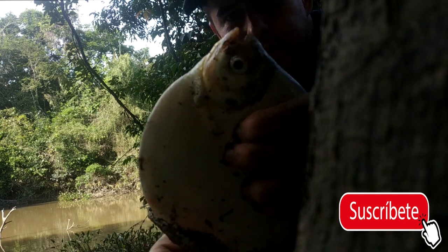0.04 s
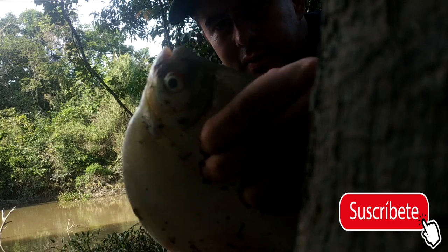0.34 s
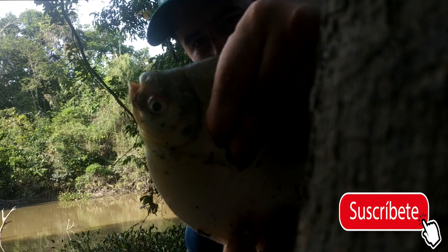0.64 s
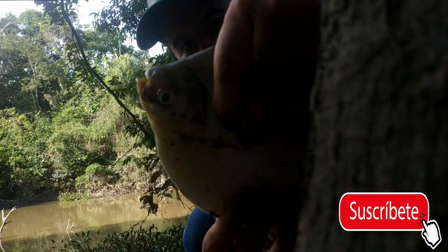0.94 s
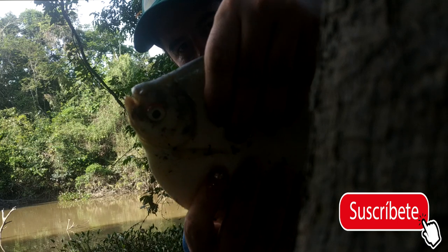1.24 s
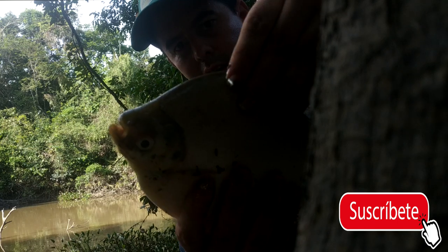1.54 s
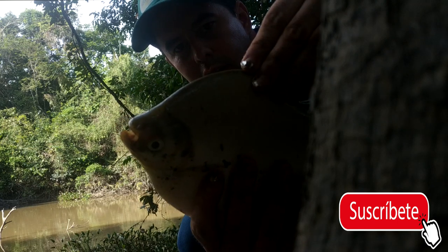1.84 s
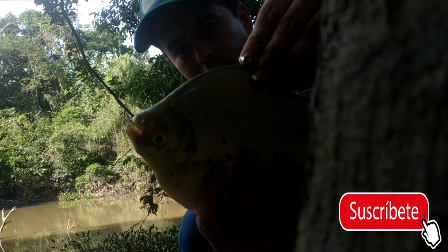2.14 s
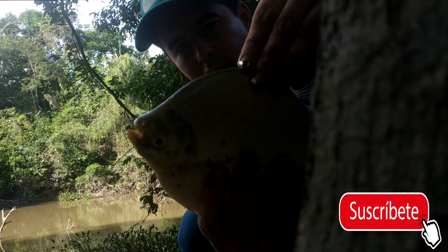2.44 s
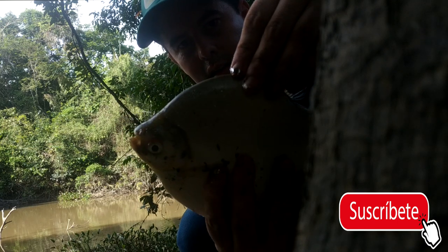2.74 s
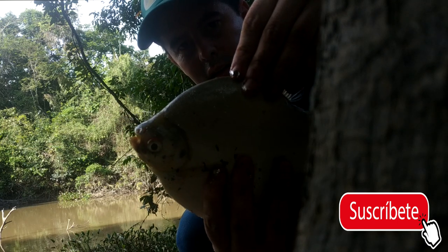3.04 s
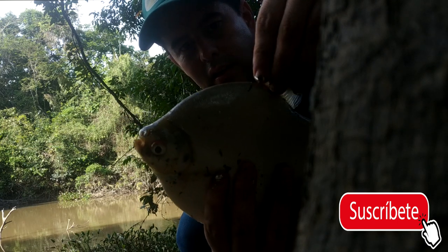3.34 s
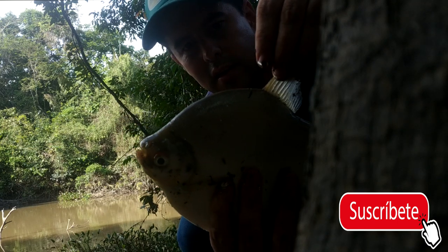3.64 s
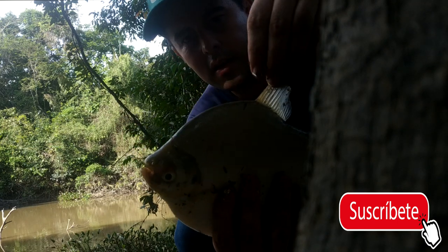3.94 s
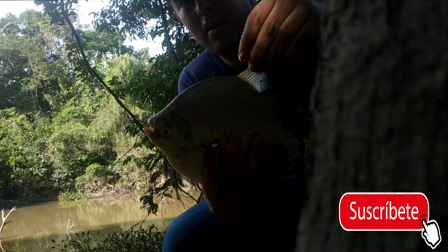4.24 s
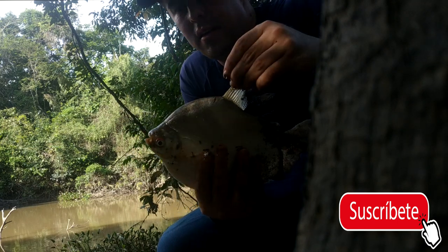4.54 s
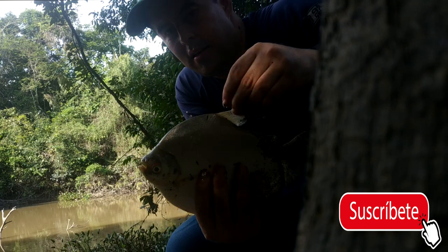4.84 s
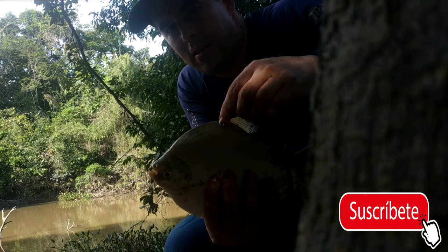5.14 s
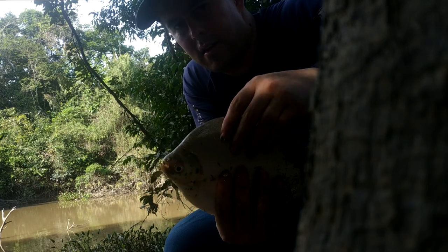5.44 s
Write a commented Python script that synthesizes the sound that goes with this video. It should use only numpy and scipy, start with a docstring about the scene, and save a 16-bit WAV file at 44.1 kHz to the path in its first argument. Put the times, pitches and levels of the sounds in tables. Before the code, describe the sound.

A high-pitched cicada chorus buzzes without a break for the whole five and a half seconds, outdoors on a wooded river bank. It is by far the loudest sound. One cicada is nearer and to the right, with a fast, fine rattle; a neighbour beats gently against it, and more distant ones blend into a hiss among the leaves. At about 0.7 seconds a bird gives one short, faint, falling chirp that lingers slightly in the trees. A tiny dry tick comes at about 2.4 seconds, and a second similar chirp at about 3 seconds. A hand brushes barely audibly over a fish at 0.3 seconds, then rubs softly over its scales from about 4 to 4.4 seconds, just as the near cicada swells slightly. A quiet, low wash of open air and a faint woodland hiss continue underneath throughout.

```python
"""A wooded river bank. A cicada buzzes as its two tymbals buckle in turn: a train of impulses, shaped by
the resonances of tymbal and abdomen and scattered by the foliage. A neighbour at almost the same rate
beats against it, and more drone further off. A bird gives two short falling chips, a hand rustles by
friction over a fish that it holds, and something ticks faintly. Beneath it all lie the low wash of the
open air and the hiss of the woods."""
import sys
import numpy as np
from scipy import signal
from scipy.fft import rfft, irfft, next_fast_len
from scipy.io import wavfile
from scipy.ndimage import uniform_filter1d, map_coordinates

SR = 44100
rng = np.random.default_rng(int(sys.argv[2]) if len(sys.argv) > 2 else 0)


def materialize(psi):
    """Save the field psi as 16-bit PCM at rate SR to the path in sys.argv[1].

    A 1-D psi becomes a single channel; in a 2-D psi each row is a channel.
    """
    bounded = np.clip(np.atleast_2d(psi).T, -1, 1)
    quanta = np.round(bounded * 32767).astype(np.int16)
    wavfile.write(sys.argv[1], SR, quanta)


N = 246430

# Cycle rate of each tymbal of the near cicada, slowly rising: t/s, f/Hz
NEAR_RATE = [(0, 77.66), (.75, 77.87), (1.35, 77.98), (2.0, 78.0), (3.0, 78.19), (3.25, 78.21),
             (3.6, 78.36), (4.0, 78.45), (5.0, 78.88), (5.59, 79.04)]
# Its direct sound, which comes and goes with the cover in between: t/s, level/dB
DIRECT_LEVEL = [(0.0, -37.5), (0.17, -35.8), (0.42, -41), (0.65, -39.3), (0.9, -42), (1.4, -41.5),
                (1.75, -36.5), (2.0, -38.3), (2.2, -38.5), (2.65, -41), (3.05, -37.5), (3.35, -37.5),
                (3.6, -39), (3.85, -36.8), (4.08, -33.3), (4.28, -31.4), (4.5, -35.3), (4.72, -35),
                (5.1, -37.3), (5.35, -40.5), (5.59, -39.5)]
# Base level shared by its echoes and all the other cicadas: t/s, level/dB
CHORUS_LEVEL = [(0, -36.5), (0.6, -36.5), (1.1, -36), (1.9, -35.5), (2.45, -37), (2.75, -36.2),
                (3.3, -36.5), (3.9, -36), (4.3, -35.5), (4.55, -35.5), (5.0, -35.5), (5.59, -35.5)]
def near_cicada(left_db=-5, scattered_db=-2, left_lag_samples=20):
    """Time and level differences place the direct clicks on the right; leaf echoes follow them."""
    song = tymbals(curve(NEAR_RATE) + .008 * wobble(5), jitter_us=5, gap_ms=.39)
    right = song * amp(curve(DIRECT_LEVEL))
    left = amp(left_db) * np.roll(right, left_lag_samples)
    echoes = foliage(song, t60=.088, sparse=1.6, patterns=12)
    return np.array([left, right]) + echoes * amp(curve(CHORUS_LEVEL) + scattered_db)


# Resonances of tymbal and abdomen: f/Hz, relative level/dB
SONG_SPECTRUM = [(4500, -48), (6250, -36.5), (6700, -13), (7100, -6), (7450, -5.5), (7900, -0.5),
                 (8400, -1.5), (9000, 0.5), (9450, 1.5), (9900, -0.3), (10250, 0.1), (10600, -6),
                 (11050, -7.5), (11700, -15.5), (12400, -20), (13200, -23), (15700, -32.5)]
# The two tymbals: phase/cycles, relative level/dB
TYMBAL_PAIR = [(0, 0), (.505, -.5)]
def tymbals(rate, jitter_us, gap_ms, spread_db=.8, second_rib_db=-5.5):
    """Buckling excites resonance: two tymbals snap in turn, a little unevenly, two ribs to a snap."""
    phase = np.cumsum(rate) / SR + rng.random()
    cycles = np.arange(1, int(phase[-1]))
    train = np.zeros(N)
    for turn, side_db in TYMBAL_PAIR:
        snap = np.interp(cycles + turn, phase, np.arange(N))
        for at, rib_db in ((snap, 0), (snap + gap_ms * SR / 1e3, second_rib_db)):
            late, size = rng.standard_normal((2, len(at)))
            train += impulses(at + late * jitter_us * SR / 1e6, amp(side_db + rib_db + spread_db * size))
    return coloured(train, SONG_SPECTRUM)


# Cycle rate of the neighbour, rising and falling back in turns: t/s, f/Hz
SECOND_RATE = [(0, 77.55), (1.15, 77.8), (1.28, 77.53), (2.2, 77.76), (3.15, 77.95), (3.25, 77.6),
               (3.7, 77.53), (5.59, 77.82)]
def neighbour(gain_db=-5, right_db=2.5):
    """Beating: a second cicada, heard only through the leaves, sings at almost the rate of the first."""
    song = tymbals(curve(SECOND_RATE) + .008 * wobble(5), jitter_us=5, gap_ms=.44)
    echoes = foliage(song, t60=.27, sparse=1.5, patterns=7)
    return echoes * amp(curve(CHORUS_LEVEL) + gain_db) * amp([[0], [right_db]])


# The distant singers: cycle rate f/Hz, relative level/dB, gap between ribs t/ms
FAR_SINGERS = [(74.44, 3.5, 0.323), (81.8, 4.5, 0.441)]
def far_cicadas(buzz_db=-9, haze_db=-5, right_db=4):
    """Incoherent summation: two buzzes stand out deep in the trees, and many more merge into a hiss."""
    buzz = np.zeros((2, N))
    for rate, db, gap_ms in FAR_SINGERS:
        song = tymbals(rate + .05 * wobble(3), jitter_us=15, gap_ms=gap_ms)
        buzz += amp(db) * foliage(song, t60=.48, sparse=1.8, patterns=5)
    haze = coloured(rng.standard_normal((2, N)), SONG_SPECTRUM)
    chorus = amp(buzz_db) * unit(buzz) + amp(haze_db) * haze
    return chorus * amp(curve(CHORUS_LEVEL)) * amp([[0], [right_db]])


# The bird's chips: onset t/s, source level/dB, start f/Hz, end f/Hz, duration t/s
BIRD_CHIPS = [(.690, -38.6, 3000, 1680, .038), (3.044, -39.9, 3000, 1660, .034)]
# Resonances of throat and beak: f/Hz, gain/dB
THROAT_GAIN = [(1500, -18), (1850, -4), (2050, -5), (2300, -1), (2500, -7), (2700, -8), (2900, -4),
               (3300, -22)]
def bird(swell=.9, rasp_hz=160, ground_db=-4.5, trees_db=-.5):
    """Source and filter: raspy falling sweeps cross the throat's resonances and linger in the trees."""
    calls = np.zeros(N)
    rasp = rasp_hz * wobble(1300)
    for onset, db, start_hz, end_hz, length in BIRD_CHIPS:
        progress = np.linspace(0, 1, int(length * SR))
        at = round(onset * SR) + np.arange(len(progress))
        pitch = start_hz + (end_hz - start_hz) * progress + rasp[at]
        envelope = np.abs(np.sin(np.pi * progress)) ** .5 * np.exp(-swell * np.abs(2 * progress - 1))
        calls[at] += amp(db) * np.sin(2 * np.pi * np.cumsum(pitch) / SR) * envelope
    calls = filtered(calls, lambda hz: amp(along(THROAT_GAIN, hz)))
    ground = amp(ground_db) * scatter(calls, t60=.08)
    trees = amp(trees_db) * scatter(calls, t60=.6)
    return calls + ground + trees


# Skin catching on scales: f/Hz, relative level/dB
SCALE_SPECTRUM = [(100, -30), (600, -3), (1500, -3.5), (2600, -6.5), (3600, -1), (4700, 4.5), (5900, -1),
                  (7000, -0.5), (12000, -16)]
# Skin rubbing on skin: f/Hz, relative level/dB
SKIN_SPECTRUM = [(100, -32), (500, -17), (820, 5), (1120, -4), (1520, 5.5), (2100, -9), (2800, 4.5),
                 (3400, -9), (7000, -13)]
# Strokes of the hand on the fish: onset t/s, duration t/s, level/dB, dull share of the power (0-1)
HAND_STROKES = [(.295, .04, -58.5, .15), (3.95, .25, -50.6, .1), (4.185, .08, -53.8, .7),
                (4.27, .08, -57.5, .05)]
def hand(grip_s=.045, ease_db_per_s=6, release_t60=.2):
    """Friction: skin slides over scales in small uneven catches, or rubs more dully."""
    crisp, dull = wash(SCALE_SPECTRUM), wash(SKIN_SPECTRUM)
    rubbing = np.zeros((2, N))
    for onset, length, db, share in HAND_STROKES:
        age = np.maximum(np.arange(N) / SR - onset, 0)
        release_db = -60 * np.maximum(age - length, 0) / release_t60
        envelope = np.minimum(age / grip_s, 1) * amp(db - ease_db_per_s * age + release_db)
        rubbing += envelope * (np.sqrt(1 - share) * crisp + np.sqrt(share) * dull)
    catches = amp(2 * wobble(220))
    return rubbing * unit(catches)


# Resonance of the tick: f/Hz, relative level/dB
TICK_SPECTRUM = [(1500, -45), (2700, -16), (3100, -1), (3500, 0), (4100, -22), (8000, -50)]
def tick(onset_s=2.438, level_db=-50.5, t60=.07):
    """Exponential decay of a band of noise: one faint dry tick, perhaps a twig."""
    age = np.arange(N) / SR - onset_s
    decay = amp(-60 * np.abs(age) / t60)
    return amp(level_db) * decay * (age >= 0) * wash(TICK_SPECTRUM)


# Low wash of the open air: f/Hz, relative level/dB
AIR_SPECTRUM = [(15, -68), (25, -52), (96, -27.5), (124, -20), (157, -10.5), (179, -6), (198, 0.8),
                (264, -2), (313, -4), (416, -5.5), (453, -7.5), (634, -8), (1090, -12.5), (1400, -16),
                (1820, -31), (3080, -120)]
# Its slow rise and fall: t/s, level/dB
AIR_SWELL = [(0, -55.6), (0.65, -55.3), (1.0, -54), (1.2, -56), (1.6, -55.2), (2.4, -56), (2.98, -55.8),
             (3.13, -53.3), (3.3, -56.5), (3.9, -56), (4.1, -54.8), (4.7, -56.3), (5.25, -55.2),
             (5.59, -55.6)]
# Hiss of the woods: f/Hz, relative level/dB
WOODS_SPECTRUM = [(100, -65), (1100, -9), (1650, 5.5), (2250, 6.5), (2750, 4.5), (3400, 3), (4600, 6),
                  (5800, 0), (9000, -4.5), (13000, 0), (15000, 1.5), (15800, -12.5)]
def open_air(hiss_db=-56):
    """Ambient noise: the low wash of the river valley and the faint hiss of the woods."""
    low = amp(curve(AIR_SWELL)) * wash(AIR_SPECTRUM)
    hiss = patchy(wash(WOODS_SPECTRUM), depth_db=1.6)
    return low + amp(hiss_db) * hiss


# Likeness of left and right: f/Hz, correlation coefficient
CORRELATION = [(40, 1), (130, 0.76), (280, 0.62), (550, 0.33), (1000, -0.35), (2000, 0.071), (5000, -0.014)]
def wash(spectrum):
    """Diffuse field: noise arrives from all around, so left and right agree only in the bass."""
    def weights(hz):
        angle = np.arccos(along(CORRELATION, hz)) / 2
        return np.array([np.cos(angle), np.sin(angle)])
    mid, side = filtered(rng.standard_normal((2, N)), weights)
    return coloured(np.array([mid + side, mid - side]), spectrum)


def foliage(x, t60, sparse, patterns):
    """Multipath scattering: as things move, one echo pattern fades into the next, at a steady rms of 1."""
    place = np.linspace(0, patterns - 1, N)
    fades = (np.cos(np.pi / 2 * np.clip(place - k, -1, 1)) for k in range(patterns))
    echoes = sum(fade * scatter(x, t60, sparse) for fade in fades)
    return echoes / np.sqrt(uniform_filter1d(echoes ** 2, size=SR // 5, axis=1))


def scatter(x, t60, sparse=1):
    """Reverberation: stereo echoes of even colour fall 60 dB in t60 s; with sparse > 1 a few stand out."""
    t = np.arange(SR // 2) / SR
    paths = rng.standard_normal((2, len(t)))
    response = rfft(np.sign(paths) * np.abs(paths) ** sparse * amp(-60 * t / t60))
    colour = np.sqrt(uniform_filter1d(np.abs(response) ** 2, size=50, axis=1))
    return signal.fftconvolve(x[None], irfft(response / colour), axes=1)[:, :N]


def patchy(x, depth_db):
    """Random amplitude modulation: each band of a noise swells and fades on its own."""
    bands = signal.stft(x, nperseg=512)[2]
    swells = uniform_filter1d(rng.standard_normal(bands.shape[1:]), size=4, axis=0)
    swells = uniform_filter1d(swells, size=14, axis=1)
    return unit(signal.istft(bands * amp(depth_db * unit(swells)), nperseg=512)[1][:, :N])


def impulses(at, sizes):
    """Band-limited interpolation: a windowed sinc places each impulse between samples."""
    taps = np.floor(at).astype(int)[:, None] + np.arange(-7, 9)
    offset = taps - at[:, None]
    shape = np.sinc(offset) * np.cos(np.pi * offset / 16) ** 2
    return np.bincount(np.clip(taps, 0, N).ravel(), (sizes[:, None] * shape).ravel(), N + 1)[:N]


def coloured(x, spectrum):
    """Spectral shaping by (f/Hz, level/dB) points, scaled to rms 1."""
    return unit(filtered(x, lambda hz: amp(along(spectrum, hz))))


def filtered(x, response):
    """Linear filtering: the spectrum of x times a frequency response."""
    size = next_fast_len(N + SR // 2)
    return irfft(rfft(x, size) * response(np.fft.rfftfreq(size, 1 / SR)), size)[..., :N]


def wobble(rate):
    """Smooth random fluctuation, with rate knots a second."""
    return map_coordinates(rng.standard_normal(int(N * rate / SR) + 4), [np.arange(N) * rate / SR])


def curve(rows):
    """Linear interpolation of (t/s, value) rows at every sample."""
    return np.interp(np.arange(N) / SR, *np.transpose(rows))


def along(points, hz):
    """Interpolation of (f/Hz, value) points on a logarithmic frequency axis."""
    f, values = np.transpose(points)
    return np.interp(np.log(hz + 1), np.log(f + 1), values)


def unit(x):
    """Normalisation to rms 1."""
    return x / np.sqrt(np.mean(x ** 2) + 1e-20)


def amp(db):
    """Amplitude ratio of a level in decibels."""
    return 10 ** (np.asarray(db) / 20)


def scene():
    """Superposition: the sound pressures of all sources on the bank add."""
    return near_cicada() + neighbour() + far_cicadas() + bird() + hand() + tick() + open_air()


TOP_HZ = 15780
def record(dry):
    """Band limiting: an ideal low-pass filter keeps nothing above TOP_HZ."""
    return filtered(dry, lambda hz: hz < TOP_HZ)


dry = scene()
out = record(dry)
materialize(out)
```